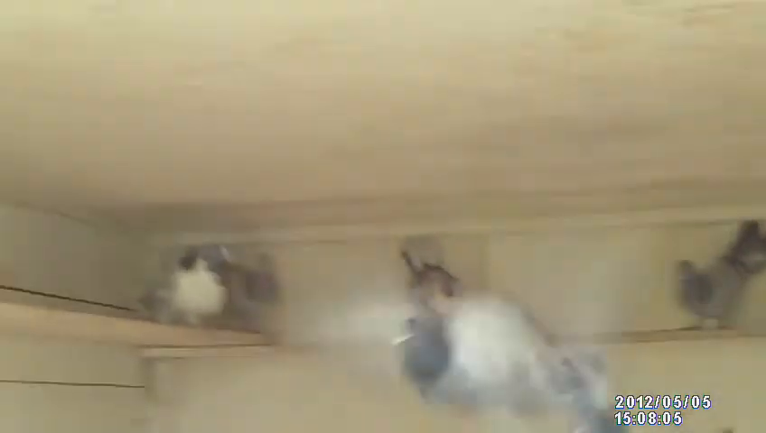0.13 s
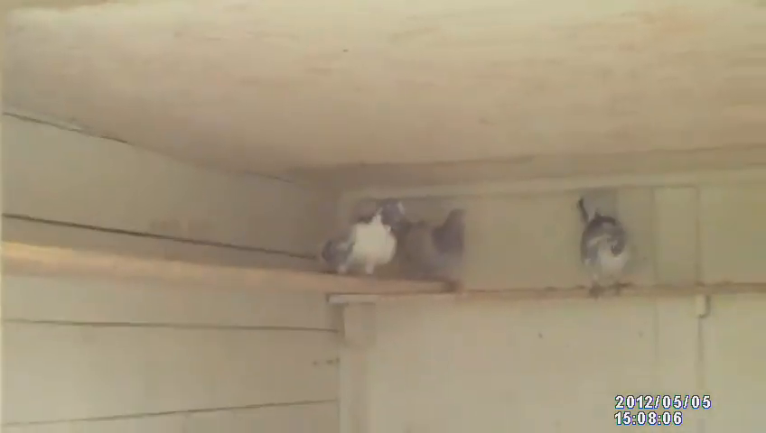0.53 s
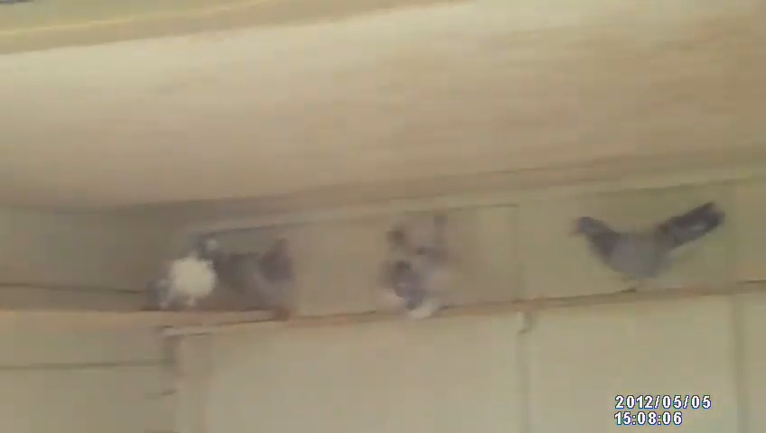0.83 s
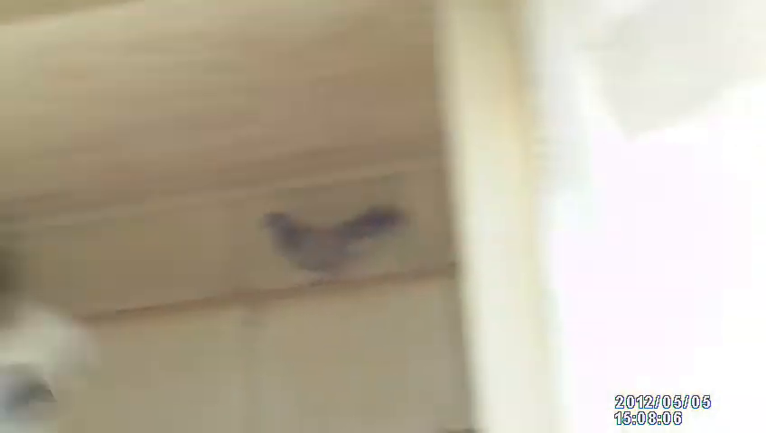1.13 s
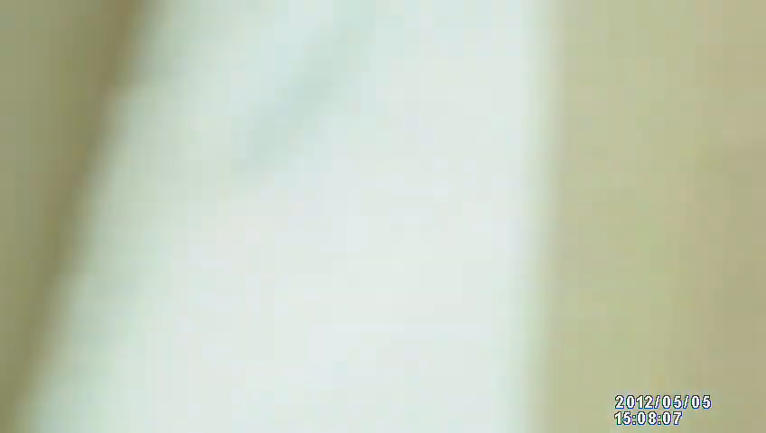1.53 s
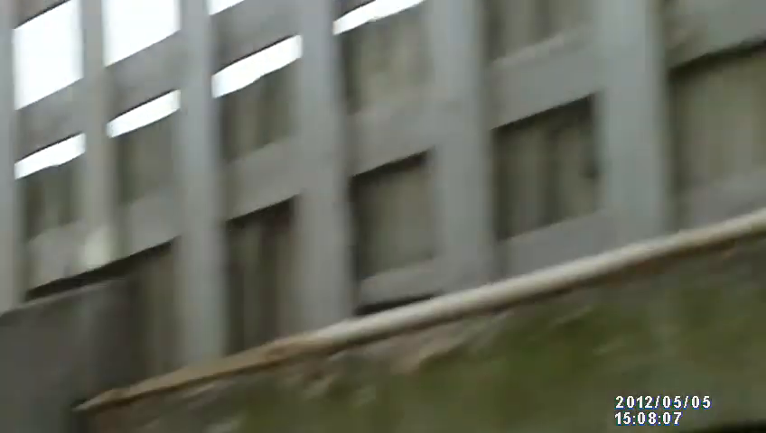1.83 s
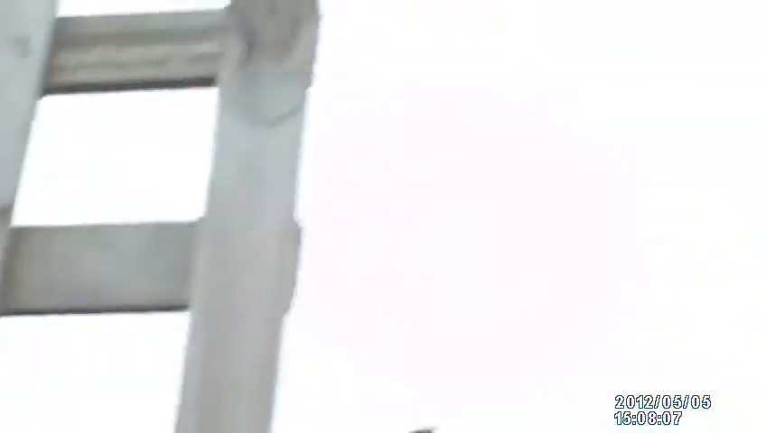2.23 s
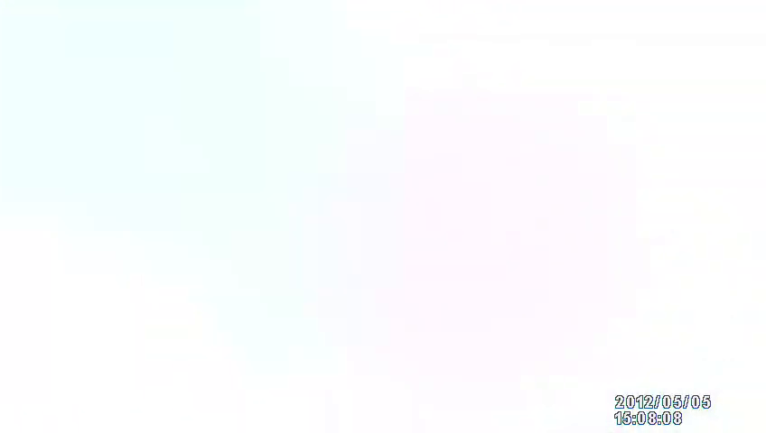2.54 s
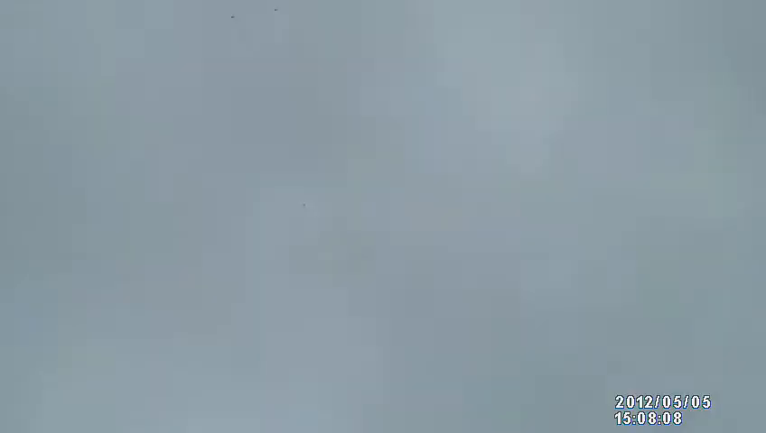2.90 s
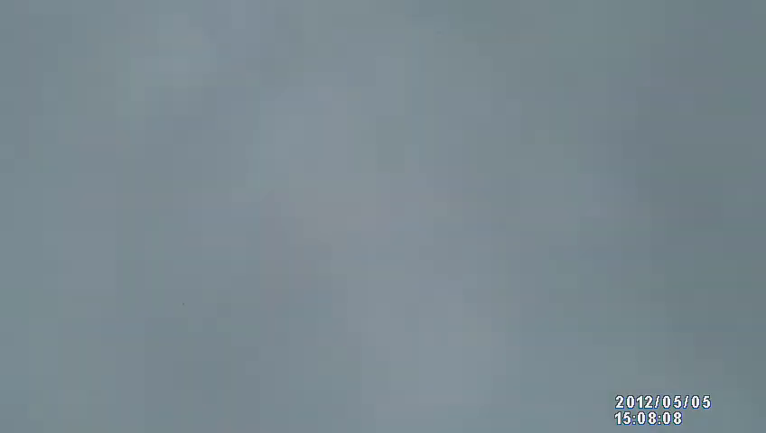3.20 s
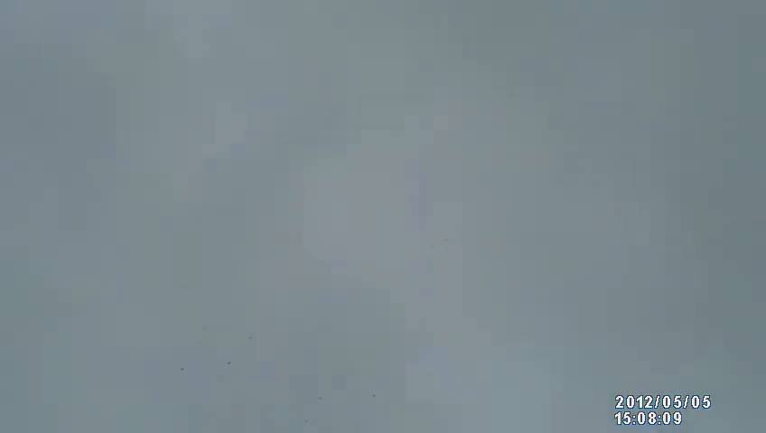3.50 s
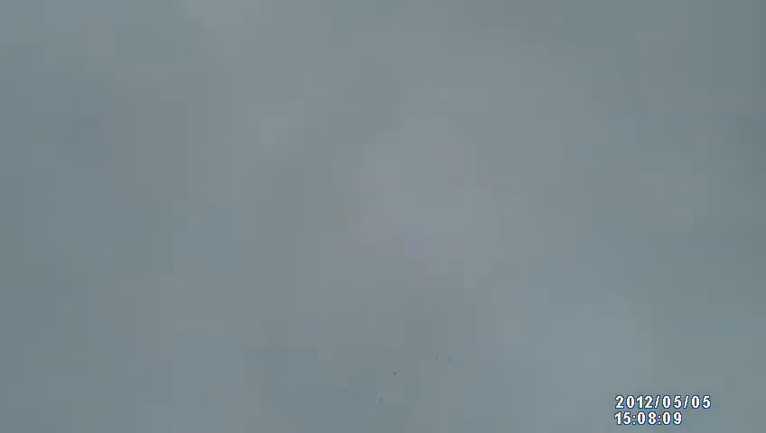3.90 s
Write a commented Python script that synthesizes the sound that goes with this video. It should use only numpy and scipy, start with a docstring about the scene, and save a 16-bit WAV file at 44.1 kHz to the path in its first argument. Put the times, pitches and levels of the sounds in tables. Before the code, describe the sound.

A dense, dry flurry of bird wings starts at once: clapping, crackling quills and beats at about eight or nine a second. A small compact microphone hears them near, thin in the bass and briefly overloaded. The wooden room's short reflections weaken as the birds get outside, brief feathery hoots slip through, and the last distant claps ring hollowly before quiet hiss and a soft rustle.

```python
"""A flock of pigeons bursts out of a small wooden loft and flies away past the microphone.
Each bird beats about eight or nine times a second, a hiss of feathers and a whoosh of air made from shaped noise.
Wing tips clap as paired noise cracks, quills crackle in dense ticks, and stiff flight feathers hoot briefly.
Inside, the boards resonate and reflect the flurry; outside, the last birds clap with a hollow ring of
gliding tones over a faint outdoor hush."""
import sys
import numpy as np
from scipy import signal
from scipy.fft import rfft, irfft
from scipy.io import wavfile
from scipy.ndimage import uniform_filter1d

SR = 44100
rng = np.random.default_rng(int(sys.argv[2]) if len(sys.argv) > 2 else 0)


def digitize_waveform(pressure):
    """Quantize a signal to 16-bit integers and store it at the path in sys.argv[1].

    Rows of a 2-D input are taken as channels; values are limited to [-1, 1].
    """
    field = np.atleast_2d(pressure).T
    bounded = np.clip(field, -1, 1)
    quanta = np.round(bounded * 32767).astype(np.int16)
    wavfile.write(sys.argv[1], SR, quanta)


N = 178737
TIME = np.arange(N) / SR
FENCE_S, OPEN_S = 1.5, 2.0  # from here the birds are along the fence, then in the open


def undb(db):
    """Decibels to gain."""
    return 10 ** (np.asarray(db) / 20)


def unit(x):
    """Scale to rms 1 along time."""
    return x / np.sqrt(np.mean(x ** 2, axis=-1, keepdims=True) + 1e-20)


def add(out, x, start_s):
    """Mix x into out, starting at start_s seconds and trimmed to the scene."""
    start = int(start_s * SR)
    lo, hi = max(start, 0), min(start + len(x), N)
    out[lo:hi] += x[lo - start:hi - start]


def bins(n):
    """Frequencies in Hz of an n-sample spectrum, at least 1."""
    return np.maximum(np.fft.rfftfreq(n, 1 / SR), 1)


def colour(points, hz):
    """Gain of a (Hz, dB) outline, drawn straight over log frequency."""
    at, db = np.transpose(points)
    return undb(np.interp(np.log(hz), np.log(at), db))


def walk(n, rate_hz):
    """A smooth random wander of rms 1, with rate_hz new targets per second."""
    knots = rng.standard_normal(n // 8 + 2)
    return unit(np.interp(np.arange(n) * rate_hz / SR, np.arange(len(knots)), knots))


def narrow_noise(n, hz, width_hz):
    """Turbulence inside one resonance."""
    resonance = 1 + (2 * (bins(n) - hz) / width_hz) ** 2
    return unit(irfft(rfft(rng.standard_normal(n)) / resonance, n))


def swell(t, rise_s):
    """Rises to 1 at the given time and dies away more slowly."""
    u = t / max(rise_s, 1e-4)
    return u * np.exp(1 - u)


# colour of the outdoor hush and microphone hiss: pitch_hz, level_db
HUSH_COLOUR = [(80, -30), (170, -12), (450, -4), (800, 9), (1000, 19), (1200, 10), (2500, 9.5),
               (4000, -1.5), (7500, 2), (10000, 2.5), (15000, -4)]
# a low rustle near the end: time_s, level_db
RUSTLE_LEVELS = [(3.5, -74), (3.57, -55), (3.7, -46), (3.76, -60), (4.05, -56.5)]


def hush(hush_db=-46):
    """Outdoor air that wavers slightly, with a low uneven rustle and a thin hiss near the end."""
    air = unit(irfft(rfft(rng.standard_normal(N)) * colour(HUSH_COLOUR, bins(N)), N))
    air = air * undb(1.2 * walk(N, 9.5))
    thin_hiss = narrow_noise(N, hz=10700, width_hz=3500) * undb(np.interp(TIME, [3.6, 3.85], [-72, -56]))
    rustle = narrow_noise(N, hz=240, width_hz=500) * undb(1.4 * walk(N, 32))
    rustle_db = np.interp(TIME, *np.transpose(RUSTLE_LEVELS))
    return undb(hush_db) * air + thin_hiss + rustle * undb(rustle_db)


# low thumps under the loud claps: start_s, level_db
LOW_THUMPS = [(.147, -44), (.188, -51)]


def low_thumps(size=4096, rise_s=0.002, rumble_db=-78):
    """Low thumps of swelling noise, the same on both channels, over a faint rumble on each channel by itself."""
    out, t = np.zeros(N), np.arange(size) / SR
    for start_s, level_db in LOW_THUMPS:
        thump = narrow_noise(size, hz=70, width_hz=210) * swell(t, rise_s)
        add(out, undb(level_db) * thump, start_s)
    rumble = np.array([narrow_noise(N, hz=80, width_hz=510) for channel in range(2)])
    return out + undb(rumble_db) * rumble


def reflections(x, size=8192, t60_s=0.14, loft_db=-13, open_db=-21):
    """Short scatter from boards and fence, weaker outside."""
    t = np.arange(size) / SR
    decay = np.exp(-np.log(1000) * t / t60_s)
    response = rng.standard_normal(size) * decay * (t > .003)
    send = undb(np.interp(TIME, [FENCE_S - .2, FENCE_S], [loft_db, open_db]))
    return signal.fftconvolve(x * send, unit(response) / np.sqrt(size))[:N]


# colour of the wing noise in the loft, along the fence and in the open: pitch_hz, level_db
LOFT_COLOUR = [(80, -40), (184, -26), (318, -5.5), (655, -2.5), (1010, -6.5), (1180, -12.5), (1910, -1.5),
               (2330, -5.5), (3240, 0.5), (3860, -7.5), (7120, 0), (7950, -2), (9700, 4.5), (11800, 0.5),
               (13000, -5), (15000, -5.5)]
FENCE_COLOUR = [(114, -59), (210, -36), (298, -13), (451, -8), (850, -4.5), (1200, -14.5), (1900, 0.5),
                (2400, -8), (2950, 3), (4000, -3), (5850, 2), (8680, 13.5), (15000, 3)]
OPEN_COLOUR = [(80, -39), (250, -24), (285, -18), (590, -3.5), (797, -3), (971, -7.5), (1830, -8),
               (2330, -6.5), (2550, -3), (4120, -9.5), (8300, -0.5), (12000, -5), (15000, -12)]
# resonances between the loft's boards: pitch_hz, width_hz, boost_db
BOARD_MODES = [(325, 200, -0.5), (970, 190, 5), (1320, 220, 7), (1930, 600, 5)]


def place_colour(s, hz):
    """Wing colour where the birds are at time s; the loft adds its resonances."""
    if s >= FENCE_S:
        return colour(FENCE_COLOUR if s < OPEN_S else OPEN_COLOUR, hz)
    boards_db = sum(boost_db / (1 + (2 * (hz - pitch_hz) / width_hz) ** 2)
                    for pitch_hz, width_hz, boost_db in BOARD_MODES)
    return colour(LOFT_COLOUR, hz) * undb(boards_db)


def registers(source, s, ripple):
    """Low, middle and high parts of a wing's turbulence, combed by a reflection off the bird's body."""
    n = len(source)
    hz = bins(n)
    lag_s = rng.uniform(0.00017, 0.001421)
    comb = np.abs(1 + ripple * np.exp(2j * np.pi * hz * lag_s))
    gain = place_colour(s, hz) * comb
    low, below_top = 1 / (1 + (hz / 1300) ** 8), 1 / (1 + (hz / 4500) ** 8)
    # square roots keep the summed power of the three bands whole
    shares = np.sqrt([low, below_top - low, 1 - below_top])
    return unit(irfft(rfft(source) * gain * shares, n))


def feathers(noise, air_db, hiss_db, vane_db=-3, rasp_db=1.5, rasp_hz=900, flap_db=2.0, flap_hz=240):
    """Air whooshes low, vanes flap coarsely in the middle, barbs rasp finely as feathers slide together."""
    n = noise.shape[1]
    flap = unit(undb(flap_db * walk(n, flap_hz)))
    rasp = unit(undb(rasp_db * walk(n, rasp_hz)))
    air = noise[0] * undb(air_db)
    # the vanes' level follows both air and hiss
    vanes = flap * noise[1] * undb(0.58 * air_db + 0.42 * hiss_db + vane_db)
    barbs = rasp * noise[2] * undb(hiss_db)
    return air + vanes + barbs


def stroke(s, rise_s, release_s, air_db, hiss_db, size=8192, catch_db=1.5, catch_hz=170):
    """One sweep of a wing, uneven as its feathers catch and slip, coloured by where the birds are at time s."""
    t = np.arange(size) / SR
    noise = registers(rng.standard_normal(size), s, ripple=0.45)
    rise = np.sin(np.pi / 2 * np.minimum(t / rise_s, 1))
    release = np.exp(-(np.maximum(t - rise_s, 0) / release_s) ** 1.2)
    catch = unit(undb(catch_db * walk(size, catch_hz)))
    return feathers(noise, air_db, hiss_db) * rise * release * catch


# flight feathers hooting briefly in a hard stroke: centre_s, pitch_hz, level_db, half_length_s
FEATHER_HOOTS = [(0.579, 645, -28.5, .016), (0.693, 685, -31.5, 0.02), (2.481, 610, -26, 0.009),
                 (2.518, 586, -28, 0.013), (3.041, 688, -36.5, 0.019), (3.171, 620, -35, 0.0083)]


def hoots(size=8192, sag_per_s=0.8, waver=0.06, rough_db=3.5):
    """A stiff flight feather flutters for a moment, roughly, its pitch sagging as the stroke slows."""
    out, t = np.zeros(N), (np.arange(size) - size / 2) / SR
    for centre_s, pitch_hz, level_db, half_length_s in FEATHER_HOOTS:
        pitch = pitch_hz * (1 - sag_per_s * t + waver * walk(size, 150))
        tone = np.sin(2 * np.pi * np.cumsum(pitch) / SR)
        flutter = unit(tone * undb(rough_db * walk(size, 150)))
        add(out, undb(level_db) * flutter * np.exp(-(t / half_length_s) ** 2), centre_s + t[0])
    return out


def crackle(ticks_per_s=190, scatter_db=3.5, tick_s=0.0006, crackle_db=-7):
    """Quills snag on each other in dense ticks of uneven size, their level following the flock's hiss."""
    sizes = undb(scatter_db * np.clip(rng.standard_normal(N), -2, 2))
    ticks = (rng.random(N) < ticks_per_s / SR) * sizes
    decays = signal.lfilter([1], [1, -np.exp(-1 / (tick_s * SR))], ticks)
    grains = decays * rng.standard_normal(N)
    time_s, _, hiss_db = np.transpose(FLOCK_LEVELS)
    middle_and_high = registers(grains, 0, ripple=0)[1:].sum(axis=0)
    return unit(middle_and_high) * undb(np.interp(TIME, time_s, hiss_db) + crackle_db)


# cupped wings clapping further off: start_s, level_db, brightness_db
CUPPED_CLAPS = [(3.272, -31, -12), (3.357, -30, -0.5), (3.4061, -25, 3.5), (3.482, -29.5, -10.5),
                (3.53, -29, 2), (3.5901, -23.5, -2.5), (3.666, -39, -12), (3.708, -32.5, -12)]
# the ring of a hollow clap, before detuning and brightness: pitch_hz, level_db, t60_s
CUPPED_MODES = [(1023, 3.5, 0.08), (1310, -7, 0.03), (2100, -2.5, 0.035), (2700, -12, 0.04),
                (3210, 3.5, 0.046), (4370, -9, 0.018), (6800, -8, .015)]


def hollow_claps(size=4096, contact_s=0.0019, slap_db=-7, slap_s=0.0023, waver=0.012, detune=0.013,
                 bend=0.11, bend_s=0.003):
    """Air between cupped wings rings, rising in pitch as the gap closes, while the feathers slap shut."""
    out, t = np.zeros(N), np.arange(size) / SR
    glide = 1 - bend * np.exp(-t / bend_s)
    for start_s, level_db, bright_db in CUPPED_CLAPS:
        ring = np.zeros(size)
        for pitch_hz, mode_db, t60_s in CUPPED_MODES:
            # brightness tilts the modes around 1 kHz; each also wavers in level
            tilt = undb(mode_db + bright_db * np.log10(pitch_hz / 1000) * 2 + 2 * walk(size, 300))
            drift = 1 + detune * rng.standard_normal() + waver * walk(size, 270)
            phase = 2 * np.pi * (np.cumsum(pitch_hz * glide * drift) / SR + rng.random())
            ring += tilt * np.sin(phase) * np.exp(-np.log(1000) * t / t60_s)
        closing = 1 - np.exp(-t / contact_s)
        slap = narrow_noise(size, hz=2640, width_hz=2900) * np.sqrt(swell(t, slap_s))
        slap = slap * undb(slap_db + bright_db / 2)
        add(out, undb(level_db) * (ring * closing + slap), start_s)
    return out


# wing tips meeting close by, levels relative to each other:
# start_s, second_contact_lag_s, crack_db, knock_db, knock_hz, quill_shiver_db
TIP_CLAPS = [(0.0252, 0.00015, -6, -32, 2480, -22), (0.0406, 0.00057, -14, -16, 1490, -10),
             (0.1429, 0.0022, -16.5, -27, 1500, -1), (0.1488, 0.00075, -9.5, -14.5, 1480, -29),
             (0.1897, 0.00087, -8, -19, 2020, -6), (0.3661, 0.00047, -7.5, -28, 2500, -24),
             (0.4238, 0.0017, -27, -18, 900, -11), (0.5022, 0.00065, -17, -12, 1600, -6),
             (0.521, 0.0015, -21, -15, 1500, -9), (.5463, 0.0004, -12.5, -17, 1000, -20),
             (.659, .0004, -9, -36, 2500, -17), (0.7821, 0.00038, -12.5, -42, 2490, -11),
             (1.339, 0.0017, -10, -11, 3320, -8), (1.346, 0.00089, -21, -26, 3120, -5),
             (1.4444, 0.00049, -6.5, -18, 2050, -24), (1.566, 0.00098, -15.5, -18.5, 3000, -5.5),
             (1.781, 0.0012, -18.5, -32, 3000, -2), (1.881, 0.0027, -18, -30, 1500, -9),
             (2.149, .001, -21, -36, 2980, -0.5), (2.4184, 0.00045, -14.5, -26.5, 1200, -4),
             (2.62, 0.0024, -18, -25, 1500, -2), (2.641, 0.00043, -15, -29, 2000, -12),
             (2.7545, 0.0012, -8.5, -13.5, 1000, -23), (2.873, 0.003, -10, -16, 1850, -3),
             (2.9916, .0005, -14, -14.5, 2270, -9), (2.9961, .003, -15, -17.5, 2280, -4.5)]
TIP_RISE_S, CLAP_RISE_S = 0.00031, 0.00043  # the tips snap together first, then the rest of the wings
FIRST_CONTACT_DB = -2.5  # the first contact against the second


def claps(size=4096, clap_db=1.1, knock_q=0.66, shiver_s=0.0031, tail_db=-25, tail_s=0.039):
    """Two brief cracks as the wings meet; the trapped air knocks and the quills shiver on."""
    out, t, hz = np.zeros(N), (np.arange(size) - size / 2) / SR, bins(size)
    after = np.maximum(t, 0)
    for start_s, lag_s, crack_db, knock_db, knock_hz, shiver_db in TIP_CLAPS:
        quills = undb(shiver_db) * np.exp(-after / shiver_s) + undb(tail_db) * np.exp(-after / tail_s)
        cavity = 1 / (1 + 1j * knock_q * (hz / knock_hz - knock_hz / hz))
        cavity = cavity / (1 + (hz / 6000) ** 4) / (1 + (450 / hz) ** 4)
        contacts = ((start_s, FIRST_CONTACT_DB, TIP_RISE_S), (start_s + lag_s, 0, CLAP_RISE_S))
        for contact_s, contact_db, rise_s in contacts:
            shape = np.maximum(swell(after, rise_s), quills * (t > 0))
            contact = rng.standard_normal(size) * shape
            crack = registers(contact, start_s, ripple=.45)[2]
            knock = unit(irfft(rfft(contact) * cavity, size))
            burst = undb(crack_db) * crack + undb(knock_db) * knock
            burst = burst * np.sqrt(np.mean(shape ** 2))
            add(out, undb(contact_db + clap_db) * burst, contact_s + t[0])
    return out


# single strokes that stand out of the flurry: start_s, rise_s, release_s, air_db, hiss_db
SINGLE_STROKES = [(.026, .006, .035, -28.5, -24), (.302, 0.0086, 0.014, -28, -19),
                  (.374, .008, 0.028, -61, -18), (.416, 0.011, .022, -28, -22.5),
                  (0.457, 0.027, 0.0056, -23.5, -28), (.607, 0.0081, 0.0073, -29.5, -20),
                  (0.632, 0.007, 0.012, -30, -19.5), (.752, 0.008, 0.011, -41, -24),
                  (.877, 0.013, .011, -38, -32), (0.926, 0.016, 0.032, -64, -28),
                  (1.019, 0.018, 0.013, -28, -15), (1.057, 0.011, 0.014, -25.5, -24),
                  (1.107, 0.019, 0.025, -35, -28.5), (1.178, 0.016, 0.018, -28.5, -28.5),
                  (1.214, 0.011, 0.017, -28, -30), (1.278, 0.021, 0.034, -30, -25.5),
                  (1.371, 0.017, 0.017, -29.5, -25), (1.419, 0.0074, 0.012, -32, -30),
                  (1.497, 0.014, 0.017, -41, -40), (1.537, 0.012, 0.042, -35.5, -35.5),
                  (1.615, 0.023, .035, -39, -37), (1.736, 0.027, 0.029, -41, -30.5),
                  (1.815, 0.038, 0.02, -69, -21), (1.878, 0.0066, 0.027, -35.5, -22.5),
                  (1.929, 0.01, 0.017, -44.5, -17), (2.313, 0.017, 0.018, -35.5, -27.5),
                  (2.405, 0.015, 0.034, -37, -24.5), (2.47, 0.014, 0.03, -33.5, -26),
                  (2.554, 0.012, 0.02, -26, -40), (2.632, 0.0071, 0.035, -37.5, -27),
                  (2.903, 0.02, 0.021, -26, -30.5), (3.035, 0.03, 0.0083, -30.5, -35),
                  (3.097, 0.011, 0.023, -38, -36.5), (3.169, 0.026, 0.0056, -32.5, -44),
                  (3.234, 0.0068, 0.015, -35.5, -41.5), (3.29, 0.023, 0.019, -40, -50)]


def swipes():
    """Wings that sweep once past the microphone, each a single swell of air and feather hiss."""
    out = np.zeros(N)
    for start_s, rise_s, release_s, air_db, hiss_db in SINGLE_STROKES:
        add(out, stroke(start_s, rise_s, release_s, air_db, hiss_db), start_s)
    return out


# birds beating steadily past the microphone: first_beat_s, end_s, beats_hz, hiss_db, air_db, fade_db_per_s
PASSING_BIRDS = [(.094, .7, 9.3, -19, -25, 25), (2.503, 2.85, 7.95, -29, -29.5, 2)]
# one wingbeat: the feathers flick at the top, then the downstroke pushes air a share of the cycle later
FLICK_RISE_S, FLICK_RELEASE_S = 0.0094, 0.0069
DOWN_SHARE, DOWN_RISE_S, DOWN_RELEASE_S = .4, 0.013, 0.023
FLICK_AIR_DB, DOWN_HISS_DB = -1, -31  # air in a flick and hiss in a downstroke, below their full level
DULLING = 0.25  # with distance the hiss fades faster than the air, by this share


def flights():
    """Each bird beats at its own rate, a hissing flick then a whoosh, fading and dulling as it draws away."""
    out = np.zeros(N)
    for first_s, end_s, beats_hz, near_hiss_db, near_air_db, fade_db_per_s in PASSING_BIRDS:
        for beat_s in np.arange(first_s, end_s, 1 / beats_hz):
            away_db = fade_db_per_s * (beat_s - first_s)
            air_db = near_air_db - away_db
            hiss_db = near_hiss_db - away_db * (1 + DULLING)
            flick = stroke(beat_s, FLICK_RISE_S, FLICK_RELEASE_S, air_db + FLICK_AIR_DB, hiss_db)
            down = stroke(beat_s, DOWN_RISE_S, DOWN_RELEASE_S, air_db, hiss_db + DOWN_HISS_DB)
            add(out, flick, beat_s)
            add(out, down, beat_s + DOWN_SHARE / beats_hz)
    return out


# the rest of the flock, levels before its overall trim: time_s, air_db, hiss_db
FLOCK_LEVELS = [(0.0, -33, -26), (0.15, -26, -25), (0.34, -33, -28.5), (0.5, -26.5, -27),
                (0.65, -32.5, -30.5), (0.85, -37.5, -43), (0.99, -37.5, -36), (1.07, -29, -32.5),
                (1.16, -34, -33), (1.42, -36.5, -27), (1.455, -49, -43), (1.7, -48.5, -41.5),
                (1.81, -47.5, -28), (1.855, -53, -45), (1.88, -41, -39), (2.0, -36.5, -37.5),
                (2.29, -37, -36.5), (2.42, -34.5, -40), (2.6, -31, -38.5), (2.97, -36, -37.5),
                (3.14, -43.5, -50), (3.68, -44, -66), (3.78, -50, -62), (4.05, -50, -58)]


def flock(count=5, beat_hz=8.1, depth=1.34, flock_db=-1.0, ragged_db=2.0, ragged_hz=60):
    """Several birds beat at slightly different rates, so that their strokes overlap into a flutter."""
    time_s, air_db, hiss_db = np.transpose(FLOCK_LEVELS)
    rates = beat_hz * (1 + 0.108 * rng.standard_normal(count))
    phases = (rates[:, None] * TIME + rng.random((count, 1))) % 1
    power = np.mean(swell(phases, 0.13) ** 2, axis=0)  # here the rise is a share of the beat
    power = power / uniform_filter1d(power, SR // 8)
    beating = np.sqrt((1 + depth * power) / (1 + depth))
    # the colour changes as the birds leave the loft and then clear the fence
    left_loft, left_fence = (np.clip((TIME - at) / 0.36 + .5, 0, 1) for at in (FENCE_S, OPEN_S))
    places = [(0, 1 - left_loft), (FENCE_S, left_loft - left_fence), (OPEN_S, left_fence)]
    noise = sum(np.sqrt(share) * registers(rng.standard_normal(N), at, ripple=0) for at, share in places)
    # wings turn and shade each other, so each register flickers by itself
    noise = noise * unit(undb(ragged_db * np.array([walk(N, ragged_hz) for register in noise])))
    air_curve_db, hiss_curve_db = np.interp(TIME, time_s, air_db), np.interp(TIME, time_s, hiss_db)
    return undb(flock_db) * beating * feathers(noise, air_curve_db, hiss_curve_db)


BALANCE_DRIFT_DB, BALANCE_DRIFT_HZ = 1.0, 9.2  # a slow random drift of the stereo balance
WIDENING_DB = -15.5  # a faint opposite-sign part of the reflections that widens the sound


def scene():
    """All the wings, with a slight drift of balance, their reflections and the background."""
    wings = hoots() + crackle() + hollow_claps() + claps() + swipes() + flights() + flock()
    signs = np.array([[1], [-1]])
    drift = undb(BALANCE_DRIFT_DB * walk(N, BALANCE_DRIFT_HZ) * signs / 2)
    widening = undb(WIDENING_DB) * reflections(wings) * signs
    return wings * drift + reflections(wings) + widening + hush()


# balance of the two channels: pitch_hz, left_minus_right_db
CHANNEL_BALANCE = [(100, 5), (500, 3.5), (1900, 3.5), (2600, 0.6), (10300, 3), (13500, 0.5)]


def record(dry, low_cut_hz=130, top_hz=15300):
    """Peaks over full scale clip; bass and top are cut; low thumps join; the left channel is a little louder."""
    balance = colour(CHANNEL_BALANCE, bins(N)) ** np.array([[.5], [-.5]])
    ports, thumps = (irfft(rfft(x) * balance, N) for x in (dry, low_thumps()))
    low_cut = signal.butter(3, low_cut_hz, "high", fs=SR, output="sos")
    thin = signal.sosfilt(low_cut, np.clip(ports, -1, 1))
    # the thumps join after the bass cut and keep their low end
    top_cut = signal.ellip(10, .2, 70, top_hz, fs=SR, output="sos")
    return signal.sosfilt(top_cut, thin + thumps)


dry = scene()
out = record(dry)
digitize_waveform(out)
```